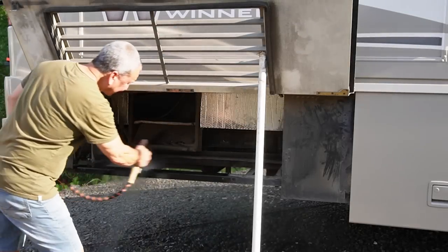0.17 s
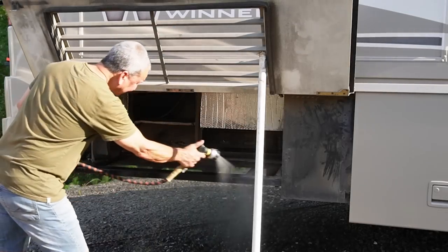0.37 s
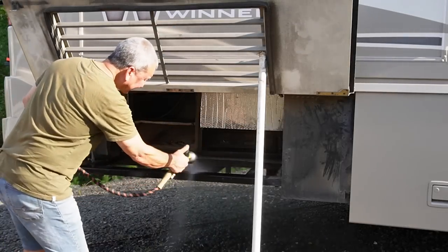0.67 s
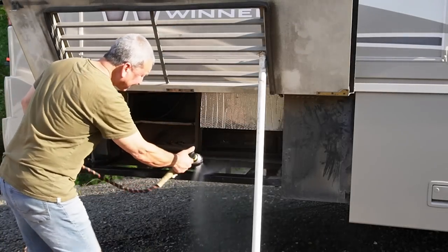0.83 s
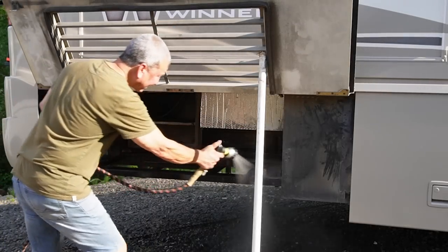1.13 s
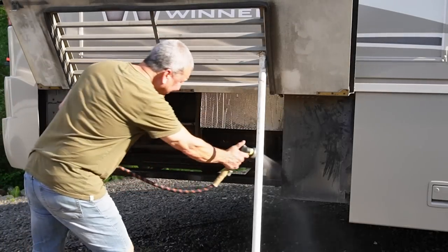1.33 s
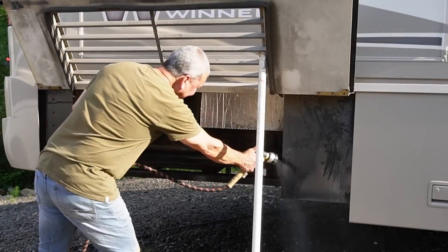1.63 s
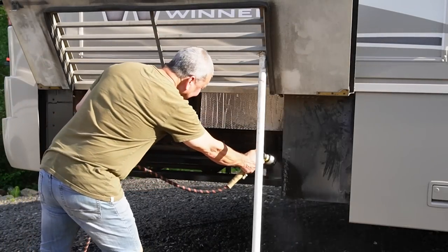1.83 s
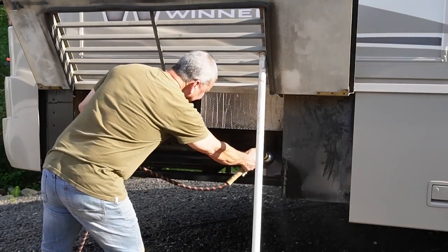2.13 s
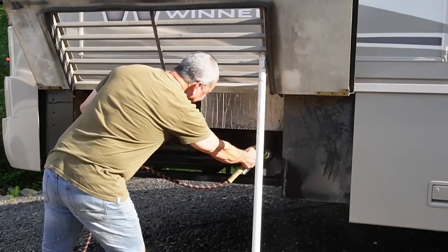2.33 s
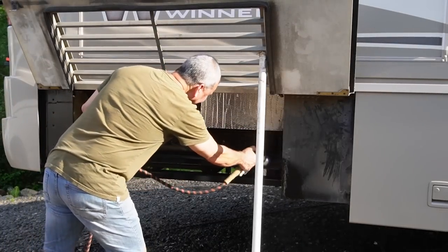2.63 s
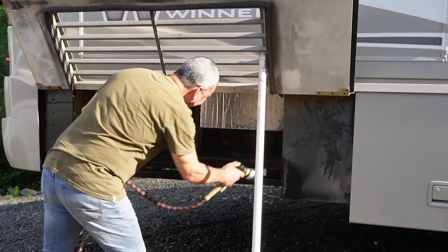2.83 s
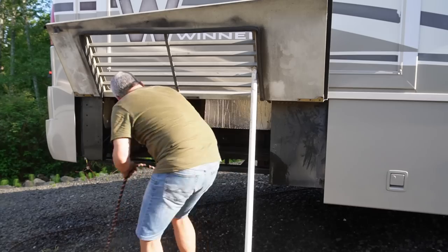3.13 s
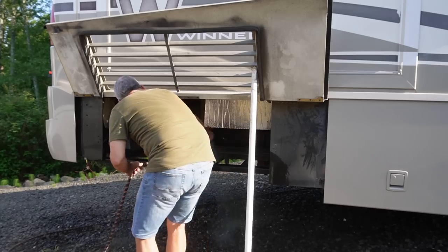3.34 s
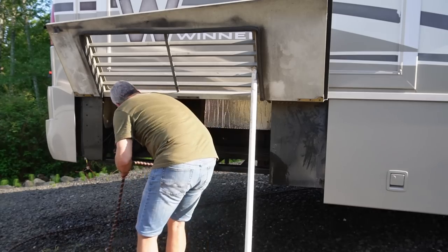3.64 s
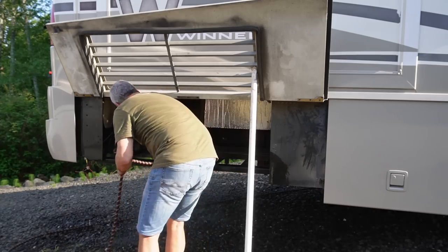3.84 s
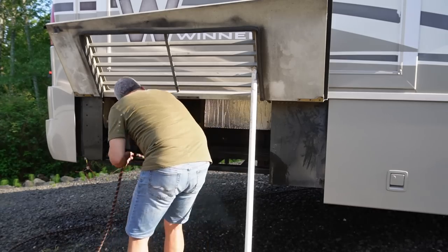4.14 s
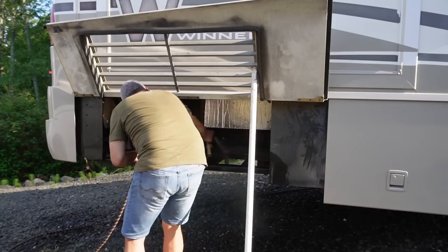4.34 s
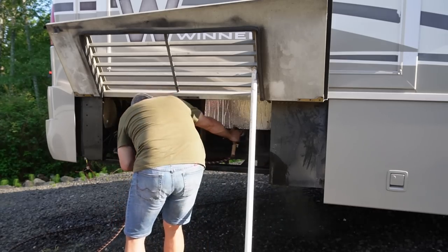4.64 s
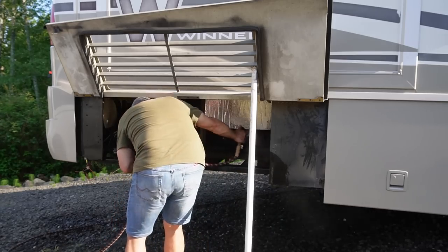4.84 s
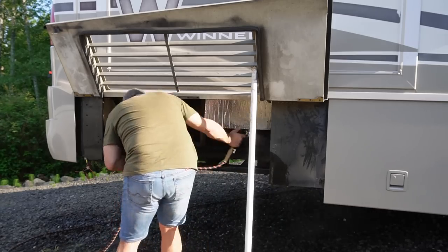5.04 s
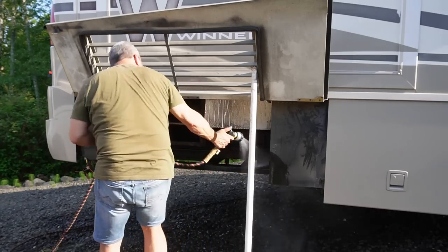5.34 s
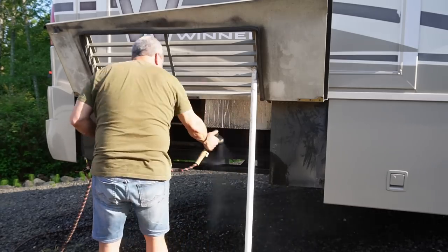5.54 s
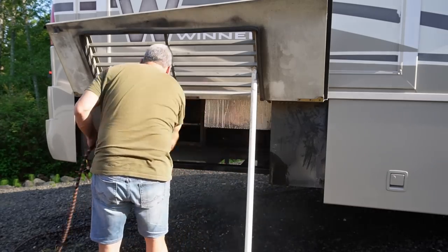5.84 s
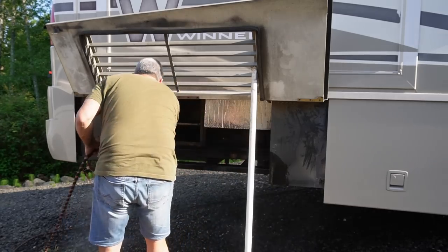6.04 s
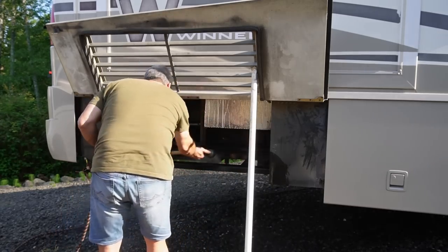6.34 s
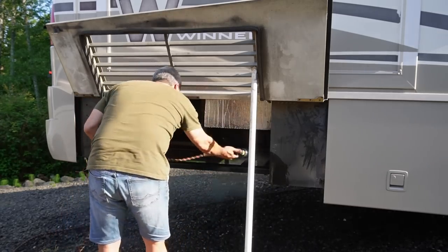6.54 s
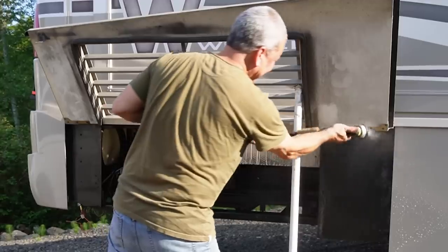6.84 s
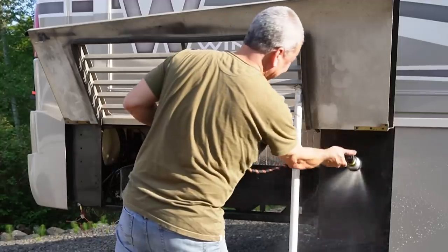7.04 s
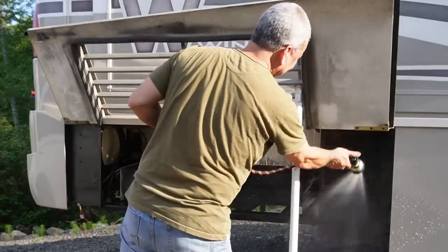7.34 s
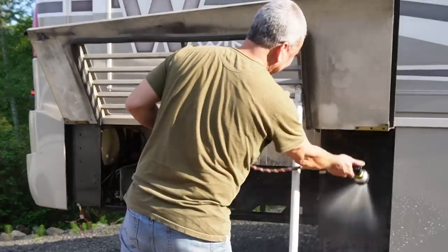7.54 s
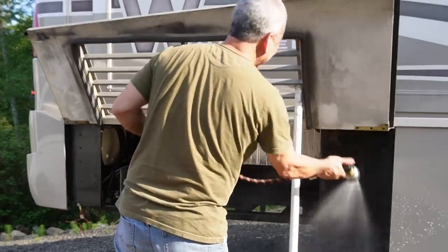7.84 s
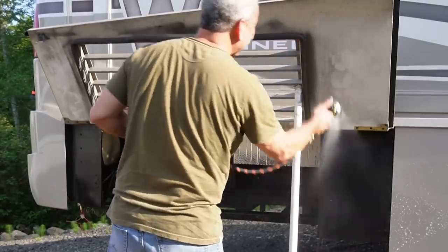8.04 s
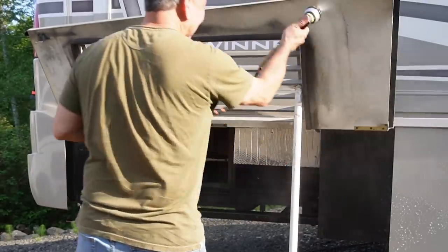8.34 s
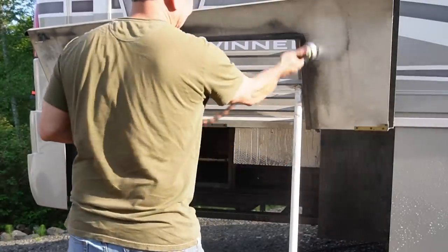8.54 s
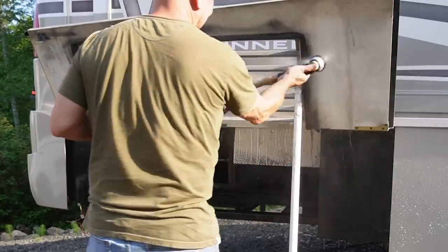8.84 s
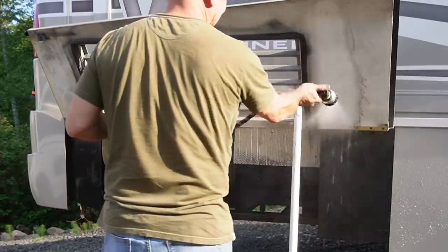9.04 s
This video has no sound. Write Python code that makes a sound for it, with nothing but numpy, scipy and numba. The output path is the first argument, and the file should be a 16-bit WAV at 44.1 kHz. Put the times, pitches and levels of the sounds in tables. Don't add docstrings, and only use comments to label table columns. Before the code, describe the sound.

Outdoors, a hose nozzle sprays hard into a metal vehicle compartment, heard close by one microphone. From 0 to 2.7 s dense drops hiss, splash and drum on panels, swelling with each sweep; thin metal parts sing faintly and wind thumps low and heavily. At about 2.7 s the valve shuts; panels ring off quickly and leftover water splats brightly on gravel, thinning to fine patter by 3.2 s. At 3.3 s valve and hose knock, the jet returns in steps, with a harder knock near 3.45 s. Until 6.7 s a lighter, uneven hiss passes over ribs, walls and gaps with small metallic ringing and weaker breeze. At 6.8 s it jumps close to a flat panel: louder, fuller drumming, low rumble and a brief high chirp. From 8.1 s a strong airy whistle enters, sags slightly, rises again and wavers until the end at 9.2 s.

```python
import sys
import numpy as np
from scipy import signal
from scipy.fft import rfft, irfft, next_fast_len
from scipy.io import wavfile
from scipy.ndimage import uniform_filter1d
from numba import njit

SR = 44100
rng = np.random.default_rng(int(sys.argv[2]) if len(sys.argv) > 2 else 0)


def output_pcm(signal):
    pcm = np.clip(np.atleast_2d(signal).T, -1, 1) * 32767
    wavfile.write(sys.argv[1], SR, np.round(pcm).astype(np.int16))


def natural_amplitude(level_db):
    exponent = np.asarray(level_db, float) / 20
    return 10 ** exponent


N = 405279

# time_s, spray_level_db
NEARNESS = [(0.0, -32.5), (0.5, -36.5), (0.9, -36.5), (1.39, -37), (1.95, -35.5), (2.65, -37.5),
            (3.42, -35.5), (3.89, -41.0), (4.21, -37), (4.89, -39), (5.6, -37.5), (6.0, -40.5), (6.62, -42),
            (6.76, -32.0), (7.69, -31.0), (8.08, -36.5), (8.2, -27.0), (9.19, -32.0)]
# centre_s, strength_db, length_s
SWEEPS = [(0.0, 5, 0.059), (0.32, 9, 0.105), (0.49, -5.5, 0.064), (0.67, 8, 0.126), (0.91, 6.0, 0.086),
          (1.15, 5, 0.057), (1.58, 5, 0.059), (1.75, 7, 0.074), (1.96, 4, 0.049), (2.13, 5.0, 0.24),
          (3.54, 0.5, 0.071), (3.76, 3.5, 0.049), (4.47, 2.0, 0.227), (4.7, -5.5, 0.039),
          (4.79, 2.5, 0.131), (5.57, -4, 0.063), (5.78, 5, 0.132), (5.97, -5.5, 0.0255),
          (6.15, -7.0, 0.052), (6.53, 3.5, 0.106), (6.86, 9.5, 0.0413), (7.0, 5.5, 0.08), (7.33, 5, 0.11),
          (7.59, 6.5, 0.0504), (7.85, 6.0, 0.063), (8.05, 6.5, 0.098), (8.38, 5.5, 0.124),
          (8.55, 5.5, 0.126), (8.75, -1, 0.036), (8.99, 9, 0.134)]
# centre_s, strength_db, length_s
STRIKES = [(0.35, 0, 0.057), (0.57, 3, 0.04), (1.45, 5, 0.0305), (1.61, 10.5, 0.03), (1.75, 10, 0.0485),
           (3.66, 7.5, 0.115), (4.07, 4, 0.152), (4.27, 3.0, 0.036), (5.05, -2, 0.07), (5.41, 1, 0.097),
           (5.6, -3.5, 0.042), (5.71, 4.0, 0.098), (6.17, -2.5, 0.067), (6.57, 5, 0.08), (6.83, 5, 0.0433),
           (6.91, 2.5, 0.033), (8.66, 4, 0.057), (8.84, 5.5, 0.063), (9.02, 2, 0.05)]
# start_s, panel_boom_db, compartment_ring_db, splash_db, mist_over_spray_db
SURFACES = [(0.0, -48, -42, -36, 1.5), (0.4, -44.5, -39, -38.0, 2.5), (0.94, -43, -37.5, -38.0, 3.5),
            (1.81, -42.5, -37.5, -36.5, 6.5), (2.28, -43.5, -41.0, -36.5, 5.0),
            (3.27, -50.5, -41.0, -37, 1), (3.45, -56.5, -41, -40.5, 3.0), (4.34, -53.5, -43.0, -39.0, 5.0),
            (5.06, -54.5, -42.5, -38.0, 3.5), (5.91, -56.5, -43.5, -40.5, 1.5),
            (6.68, -36.5, -34, -36, 3.5), (7.09, -36.5, -35.5, -34.5, 4), (7.79, -38.5, -35.5, -34.5, 1),
            (8.29, -44, -38.5, -34.0, 1.5)]
# centre_s, strength_db, length_s
OUTER_EDGE = [
    (7.6, -5.5, .2),
    (8.12, 2.5, 0.104),
    (8.45, -9, .12),
    (9.15, 27, .4),
]
# start_s, flow_db
VALVE_OPENING = [
    (3.262, -17.5),
    (3.28, -6),
    (3.45, 0),
]
# start_s, length_s, pitch_hz, over_hiss_db
NARROW_BANDS = [(1.23, 0.224, 9950, 7), (1.83, 0.23, 8060, -3), (1.9, 0.3, 3000, -8),
                (1.9, 0.5, 3110, -6), (1.95, 0.24, 7450, 4.5), (2.23, 0.26, 7440, 9),
                (2.24, 0.63, 1054, 6), (3.45, 0.06, 4130, 9), (3.45, 0.22, 3580, 8.5),
                (3.41, 0.2, 4700, 6), (3.68, 0.26, 14210, 6.5), (3.74, 0.23, 13130, 7.5),
                (3.77, 0.28, 13720, 6.5), (3.93, 0.374, 3546, 9), (4.13, 0.61, 896, 5),
                (4.18, 0.19, 7940, 7.5), (4.46, 0.26, 3620, 7), (4.74, 0.246, 5200, 8.5),
                (0.0, 2.3, 680, -5), (3.5, 0.4, 690, 6), (4.4, 0.55, 700, 5), (5.04, 0.31, 769, 4),
                (5.17, 0.34, 13530, 8.5), (5.18, 0.24, 5940, 6.5), (5.61, 0.474, 5880, 9),
                (5.94, 0.17, 10400, -0.5), (5.97, 0.17, 12550, 8.5), (6.46, 0.16, 12470, 7),
                (6.87, 0.98, 542, 4), (7.18, 0.4, 1090, -5), (7.18, 0.4, 1260, -6),
                (8.124, 0.175, 322, 8.5), (8.3, 0.25, 300, 5), (9.0, 0.19, 570, 4),
                (8.538, 0.76, 310, 10), (8.85, 0.3, 220, 8), (8.95, .15, 400, 6)]
# start_s, length_s, pitch_hz, over_hiss_db, width_hz
THIN_RODS = [(.02, .45, 3290, 9, 60), (.55, .32, 3280, 11, 60), (.93, .35, 3300, 8, 60),
             (.02, 1.0, 2940, 8, 40), (1.43, .06, 740, 9, 90), (1.69, .08, 1400, 4, 120),
             (1.685, .03, 1050, 10, 120), (1.76, .03, 1020, 8, 120), (2.2, .2, 3930, 10, 50),
             (2.69, .2, 1980, 12, 70), (3.455, .17, 1040, 8, 90), (3.47, .1, 5250, 8, 150),
             (3.6, .1, 4700, 12, 30), (3.765, .175, 4700, 16.5, 30), (3.68, .13, 4900, 10.5, 40),
             (4.0, .24, 4700, 13.5, 30), (4.105, .04, 610, 9, 70), (4.14, .05, 1040, 8, 80),
             (4.185, .05, 960, 10, 80), (4.25, .06, 870, 7, 80), (4.25, .05, 1090, 9.5, 80),
             (4.13, .1, 5090, 12, 45), (4.16, .08, 5260, 13, 55), (4.19, .06, 4160, 12, 45),
             (7.6, .5, 1330, 3, 65), (7.42, .15, 570, 9, 45), (7.3, .1, 420, 7, 45),
             (8.7, .2, 1800, 4, 250)]
# time_s, level_db, pitch_hz
WHISTLE_GLIDES = [
    [(6.8, -43.5, 4530), (6.848, -23, 4590), (6.874, -23.5, 4390), (6.92, -37, 4410)],
    [(8.112, -36, 4520), (8.127, -23, 4510), (8.23, -13, 4580), (8.305, -15, 4537), (8.316, -15, 4230),
     (8.458, -16, 4020), (8.574, -18.5, 4210), (8.6, -25, 4160)],
    [(8.6, -22, 4430), (8.75, -24.5, 4445), (8.9, -16, 4434), (9.05, -15, 4534), (9.06, -21.5, 4540),
     (9.132, -30, 4490), (9.19, -25, 4450)],
]
# start_s, skirt_db
WHISTLE_SKIRT = [
    (0, 1.5),
    (7.5, -4),
]
# start_s, peak_db, ring_hz
SPLATS = [(2.7297, -39, 2920), (2.7514, -39.5, 3520), (2.7858, -23.5, 3010), (2.8002, -36, 9000),
          (2.805, -37, 10500), (2.8274, -35.5, 6750), (2.8343, -22, 4180), (2.8402, -31, 14000),
          (2.8504, -25.5, 10900), (2.8536, -27, 14200), (2.8712, -36, 13500), (2.8786, -19.5, 6800),
          (2.8814, -28, 3000), (2.8844, -28.5, 5700), (2.8964, -32, 6426), (2.9085, -34, 8000),
          (2.9153, -31, 11800), (2.925, -35, 9000), (2.9314, -28, 7450), (2.94, -23.5, 6200),
          (2.9504, -24, 3190), (2.9535, -29, 2700), (2.9614, -29, 4500), (2.9896, -26, 7440),
          (3.0195, -34.5, 8720), (3.0354, -40.5, 9740), (3.0644, -43.5, 7640), (3.0859, -40, 6900),
          (3.108, -44, 6000), (3.1472, -42, 10700), (3.1742, -47, 12200), (3.1946, -47.5, 11000),
          (3.2034, -45.5, 5170)]
# time_s, level_db
PATTER_LEVEL = [(2.7, -39), (2.774, -47), (2.866, -38.5), (3.044, -44.5), (3.26, -63.5)]
# start_s, peak_db, ring_hz
KNOCKS = [
    (3.264, -28, 745),
    (3.3522, -20, 700),
    (3.4572, -17, 1300),
]
# time_s, level_db
WIND_LEVEL = [(0.0, -25), (.75, -25), (.88, -33.5), (1.03, -35.5), (1.32, -27.5), (1.62, -25), (1.8, -34.5),
              (2.8, -36), (2.92, -45.5), (3.14, -48.5), (3.28, -37), (3.5, -40), (3.88, -50), (3.97, -61),
              (4.2, -51), (5.3, -54), (5.65, -67.5), (9.19, -72)]
# peak_s, level_db, fall_20db_s
PUFFS = [(.71, -24, 0.21), (2.11, -23.5, 0.1445), (4.14, -45.5, 0.86), (4.3, -32, 0.185), (4.64, -35, 0.62),
         (4.98, -37.5, 0.02), (5.14, -40, 0.04), (5.23, -48, 0.55), (5.76, -42, 0.19), (5.97, -43, 0.15),
         (6.13, -50.5, 0.6), (6.49, -45.5, 0.46), (6.72, -40, 0.1), (7.34, -47.5, .15), (7.52, -44, 0.44),
         (8.2, -60.5, 1.07)]
# start_s, push (+) or pull (-), width_ms
EDDY_THUMPS = [(.015, .3, 2.5), (0.136, -0.173, 2.57), (.303, 0.12, 3.5), (.556, -.15, 4),
               (0.573, -0.17, 3.5), (0.745, 0.38, 2.29), (0.775, 0.183, 2.26), (0.803, 0.19, 3.34),
               (0.84, -0.244, 2.25), (1.235, 0.168, 4.13), (1.321, 0.252, 6.5), (1.344, -0.268, 4.3),
               (1.40, 0.22, 5.46), (1.698, 0.334, 6.63), (2.028, -.09, 5), (2.072, .1, 3.5),
               (2.29, -.05, 3), (2.62, -.05, 4), (2.703, -.05, 5), (2.802, 0.156, 5.6), (3.43, -.04, 3),
               (4.636, .04, 4), (4.654, -.04, 4), (4.713, -.04, 3.5), (4.96, -.025, 3), (5.0, .015, 3)]
# frequency_hz, density_db per Hz
RUMBLE_COLOUR = [(35, -17), (60, -4), (110, -4.5), (155, -4.5), (190, 0), (260, -26.5)]
BOOM_COLOUR = [(170, -10), (250, -11.5), (320, -3.5), (430, -2), (520, -2.5), (700, -6)]
RING_COLOUR = [(450, -25.5), (540, 0), (640, 5), (1100, 7), (1380, 4), (1600, -6.5), (2300, -31.5)]
SPLASH_COLOUR = [(1000, -35.5), (1450, 1.5), (1900, 3), (3000, 1.5), (4200, 1), (5400, -5.5), (7500, -19)]
SPRAY_COLOUR = [(2800, -15), (4200, -4), (5500, -3), (7800, -1.5), (9000, -7), (11500, -11)]
MIST_COLOUR = [(5500, -26), (8000, -10), (10000, -6), (13000, -2.5), (15000, -2.5), (17000, -7)]
GUST_COLOUR = [(12, -1), (25, -2.5), (45, -4), (70, -2.5), (110, -13), (170, -27), (300, -45.5)]
FIELD_COLOUR = [(70, -14), (130, 0), (240, -4), (400, -11), (760, -19.5), (2560, -31), (5260, -32),
                (9200, -37), (16500, -33.5)]
GRAVEL_COLOUR = [(500, -28), (1700, -18.5), (2600, -2.5), (5000, -.5), (9000, 0.0), (16500, -0.5)]
KNOCK_COLOUR = [(200, -6), (500, -9.0), (1500, -7.5), (5000, -12.5), (14000, -26)]

MOVE_S = 0.054


def water():
    t = np.arange(N) / SR
    sputter_db = 0.233 * walk(9) + .5 * walk(40)
    near, sweep, strike = curve([NEARNESS], 1), bumps(SWEEPS), bumps(STRIKES)
    boom, ring, splash, mist = steps(SURFACES, MOVE_S)
    jet, panels = valve()
    closer = near + 36.5
    outer_start_s, outer_end_s = 6.7, 8.17
    outer = -45.5 + bumps(OUTER_EDGE)
    outer = outer - 41.5 * np.maximum(t - outer_end_s, 0) - 400 * np.maximum(outer_start_s - t, 0)
    # colour, level dB, spread of drop sizes dB
    parts = [
        (RUMBLE_COLOUR, outer, 1.5),
        (BOOM_COLOUR, boom + panels + 0.91 * strike + .2 * closer, 1.5),
        (RING_COLOUR, ring + panels + 0.712 * strike + 0.308 * closer, 1.5),
        (SPLASH_COLOUR, splash + panels + 1.54 + 0.59 * strike + 0.07 * sweep + 0.113 * closer, 2.2),
        (SPRAY_COLOUR, near + jet + 1.085 + 0.428 * sweep, 2.2),
        (MIST_COLOUR, near + jet + mist + sweep, 2.2)]
    out = 0
    for points, level_db, spread_db in parts:
        flicker_db = sputter_db + 0.724 * walk(18)
        out = out + colour(drops(spread_db), points) * natural_amplitude(level_db + flicker_db)
    return metal(out)


def drops(spread_db):
    return rng.standard_normal(N) * natural_amplitude(spread_db * rng.exponential(size=N))


def valve():
    t = np.arange(N) / SR
    since = np.maximum(t - 2.6554, 0)
    shut = t < VALVE_OPENING[0][0]
    reopened = steps(VALVE_OPENING, .004)[0]
    jet = -320 * since
    panels = np.maximum(-380 * since, -16.5 - 71.5 * since)
    return np.where(shut, jet, reopened), np.where(shut, panels, reopened)


def metal(x, count=60):
    t, out = np.arange(N) / SR, x.copy()
    knots = np.arange(0, t[-1] + 1, .25)
    for pitch_draw, width_draw in rng.random((count, 2)):
        hz = 600 + 14800 * pitch_draw ** 1.6
        width_hz = 25 + 50 * width_draw
        swell = np.interp(t, knots, .44 * rng.standard_normal(len(knots)))
        out += swell * signal.lfilter(*signal.iirpeak(hz, hz / width_hz, SR), x)
    for s, length, hz, db in NARROW_BANDS:
        part = slice(int(s * SR), int((s + length) * SR))
        ring = signal.lfilter(*signal.iirpeak(hz, hz / 90, SR), x[part])
        out[part] += (natural_amplitude(db) - 1) * np.hanning(len(ring)) ** 0.197 * ring
    return out + rods(x)


def rods(x):
    out = np.zeros(N)
    for s, length, hz, db, width_hz in THIN_RODS:
        part = slice(int(s * SR), int((s + length) * SR))
        peak = signal.iirpeak(hz, hz / (1.5 * width_hz), SR)
        ring = signal.lfilter(*peak, signal.lfilter(*peak, x[part]))
        envelope = np.abs(signal.hilbert(ring)) + .1 * np.std(ring)
        ring = ring / envelope ** .6
        around = signal.lfilter(*signal.iirpeak(hz, hz / 400, SR), x[part])
        hiss = np.sqrt(uniform_filter1d(around ** 2, 2000) * width_hz / 400)
        fade = np.hanning(len(ring)) ** .4
        out[part] += (natural_amplitude(db) - 1) * fade * hiss * ring / np.std(ring)
    return out


def whistle():
    level_db = curve(WHISTLE_GLIDES, 1)
    hz = curve(WHISTLE_GLIDES, 2, off=4700) * (1 + 0.0076 * walk(30))
    loose = natural_amplitude(np.clip(-.8 * (level_db + 15), -1, 8))
    air = rng.standard_normal(N)
    skirt_width_hz = np.where(np.arange(N) < 7.5 * SR, 3000., 2100.)
    core = svf(svf(air, hz, 260 * loose), hz, 800 * loose) / np.sqrt(loose)
    skirt_hz = 1.072 * hz
    skirt = svf(svf(air, skirt_hz, skirt_width_hz), skirt_hz, skirt_width_hz)
    skirt_gain = natural_amplitude(steps(WHISTLE_SKIRT, MOVE_S)[0])
    tone = core / np.std(core) + skirt_gain * skirt / np.std(skirt)
    return tone * natural_amplitude(level_db - 2.5 + 1.09 * walk(35))


def spatter():
    hits = (rng.random(N) < 700 / SR) * natural_amplitude(1.76 * rng.exponential(size=N))
    fine = signal.oaconvolve(hits, np.exp(-np.arange(300) / 31.0))[:N]
    patter = colour(rng.standard_normal(N) * (0.45 + fine), GRAVEL_COLOUR)
    splats = bursts(SPLATS, 0.001, 0.007, -9, 0.0022, 1, -10, GRAVEL_COLOUR)
    return splats + patter * natural_amplitude(curve([PATTER_LEVEL], 1) - 9)


def knocks():
    return bursts(KNOCKS, 0.0015, 0.008, -14, 0.0018, 8, -12, KNOCK_COLOUR)


def wind():
    t = np.arange(N) / SR
    gust_db = curve([WIND_LEVEL], 1)
    for s, db, fall_s in PUFFS:
        below_db = np.where(t < s, 219.5 * (s - t), 20 * (t - s) / fall_s)
        gust_db = np.maximum(gust_db, db - below_db)
    eddies = (rng.random(N) < 60 / SR) * rng.standard_normal(N)
    buffeting = colour(eddies + 0.0114 * rng.standard_normal(N), GUST_COLOUR)
    pushes = np.zeros(N)
    for s, push, width_ms in EDDY_THUMPS:
        part = slice(max(int((s - .05) * SR), 0), int((s + .05) * SR))
        pushes[part] += push * np.exp(-((t[part] - s) * 1000 / width_ms - .5) ** 2)
    vent = signal.butter(2, 21., "high", fs=SR, output="sos")
    return natural_amplitude(gust_db) * buffeting + 1.604 * signal.sosfilt(vent, pushes)


def field():
    return colour(rng.standard_normal(N), FIELD_COLOUR) * natural_amplitude(-56)


def bursts(events, noise_s, tail_s, tail_db, ring_s, ring_db, gain_db, points):
    out, t = np.zeros(N + 4096), np.arange(4096) / SR
    noise = colour(rng.standard_normal(N + 4096), points)
    shape = np.exp(-t / noise_s) + natural_amplitude(tail_db) * np.exp(-t / tail_s)
    for s, peak_db, hz in events:
        i = int(s * SR)
        ring_shape = np.exp(-t / ring_s) * (1 - np.exp(-t * hz))
        ring = natural_amplitude(ring_db) * np.sin(2 * np.pi * hz * t) * ring_shape
        out[i:i + 4096] += natural_amplitude(peak_db + gain_db) * (noise[i:i + 4096] * shape + ring)
    return out[:N]


@njit
def svf(x, hz, width):
    y, band, low = np.empty(len(x)), 0., 0.
    for i in range(len(x)):
        g = np.tan(np.pi * hz[i] / SR)
        damping = width[i] / hz[i]
        v = (band + g * (x[i] - low)) / (1 + g * (g + damping))
        band = 2 * v - band
        low = low + 2 * g * v
        y[i] = damping * v
    return y


def colour(x, points):
    size = next_fast_len(len(x))
    hz = np.arange(size // 2 + 1) * SR / size + 1e-3
    points = np.array(points)
    db = np.interp(np.log(hz), np.log(points[:, 0]), points[:, 1], left=-90, right=-90)
    y = irfft(rfft(x, size) * natural_amplitude(db), size)[:len(x)]
    return y / np.std(y)


def walk(rate):
    k = int(SR / rate)
    held = np.repeat(rng.standard_normal(N // k + 1), k)
    w = uniform_filter1d(uniform_filter1d(held, k), k)[:N]
    return w / np.std(w)


def curve(tables, column, off=-120):
    t, out = np.arange(N) / SR, np.full(N, float(off))
    for rows in tables:
        rows = np.array(rows)
        inside = (t >= rows[0, 0]) & (t <= rows[-1, 0] + .01)
        out[inside] = np.interp(t[inside], rows[:, 0], rows[:, column])
    return out


def bumps(events):
    t = np.arange(0, N, 32) / SR
    swells = sum(db * np.exp(-((t - s) / length) ** 2) for s, db, length in events)
    return np.repeat(swells, 32)[:N]


def steps(rows, blend_s):
    rows = np.array(rows)
    index = np.clip(np.searchsorted(rows[:, 0], np.arange(N) / SR, "right") - 1, 0, None)
    return uniform_filter1d(rows[index, 1:].T, int(blend_s * SR) + 1, axis=1)


def scene():
    mono = water() + whistle() + spatter() + knocks() + wind() + field()
    return np.array([mono, mono])


def low_pass(x):
    return signal.sosfilt(signal.butter(12, 17100, fs=SR, output="sos"), x)


def record(dry):
    gate = signal.oaconvolve(1. * (rng.random(N) < 2.6 / SR), np.hanning(1900))[:N]
    treble = np.sqrt(uniform_filter1d(np.diff(dry[0], prepend=0) ** 2, 2048))
    apart = natural_amplitude(-17) * gate * treble * rng.standard_normal(N)
    apart = signal.sosfilt(signal.butter(12, 4700, "high", fs=SR, output="sos"), apart)
    rounded = np.tanh(dry) + [apart, -apart]
    top_cut = signal.ellip(10, .2, 52, 15790, fs=SR, output="sos")
    return low_pass(signal.sosfilt(top_cut, rounded))


dry = scene()
out = record(dry)
output_pcm(out)
```